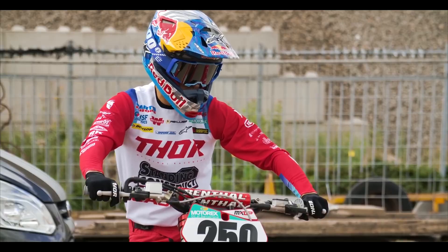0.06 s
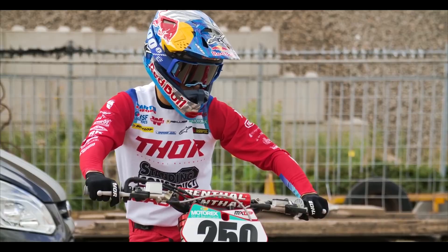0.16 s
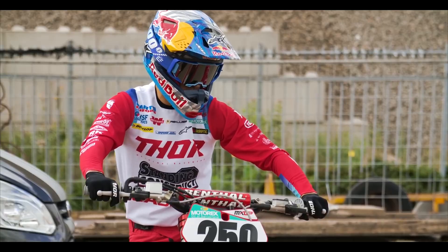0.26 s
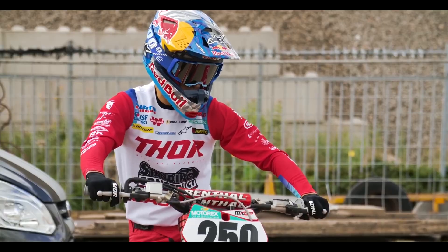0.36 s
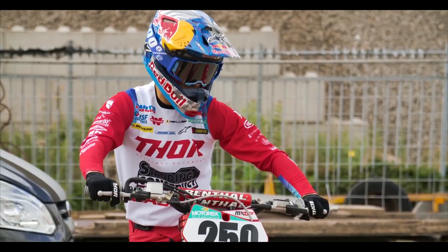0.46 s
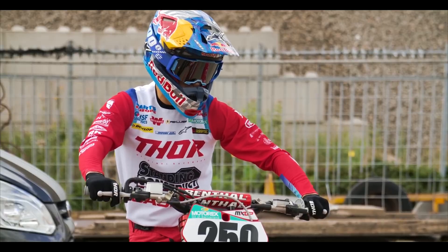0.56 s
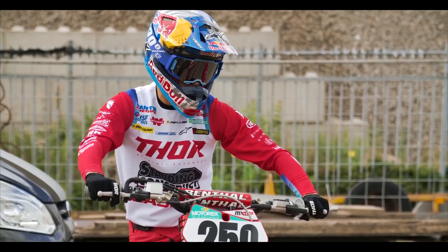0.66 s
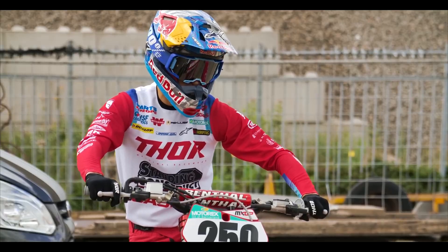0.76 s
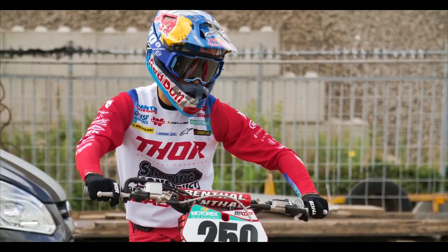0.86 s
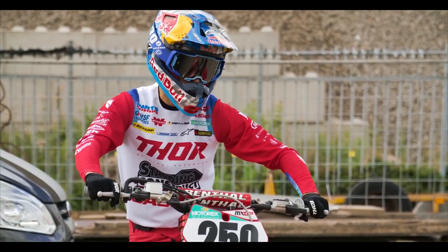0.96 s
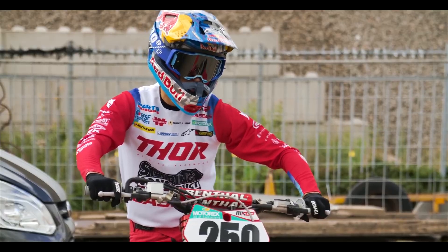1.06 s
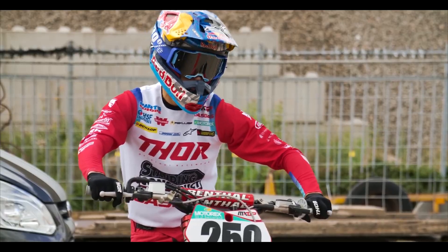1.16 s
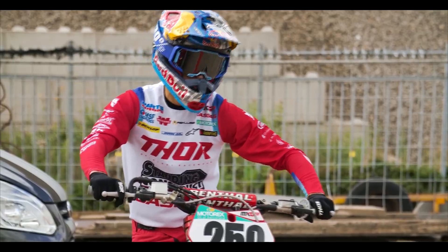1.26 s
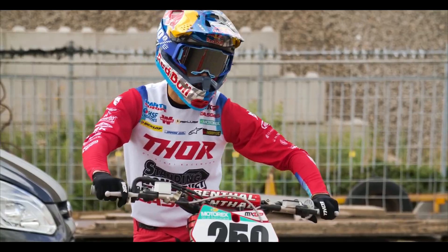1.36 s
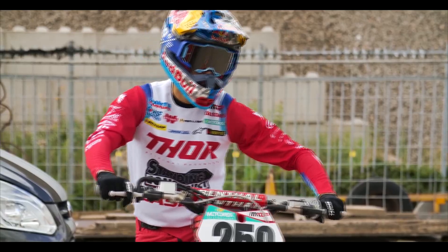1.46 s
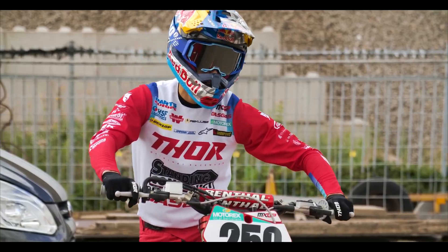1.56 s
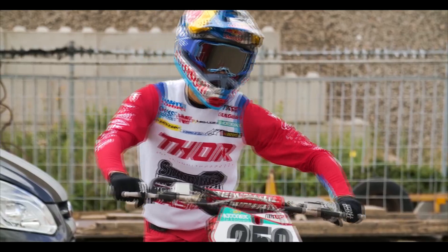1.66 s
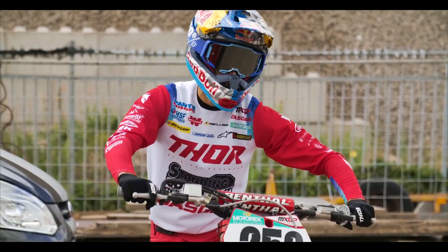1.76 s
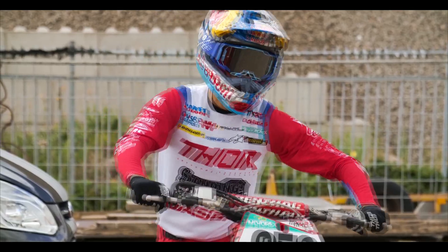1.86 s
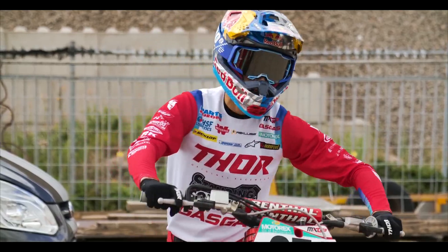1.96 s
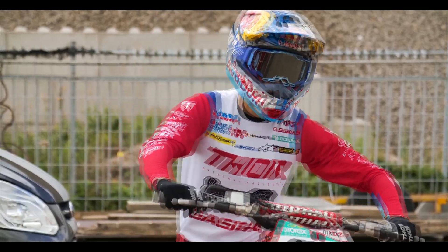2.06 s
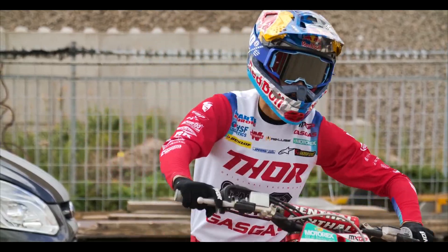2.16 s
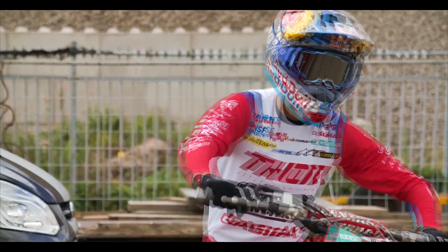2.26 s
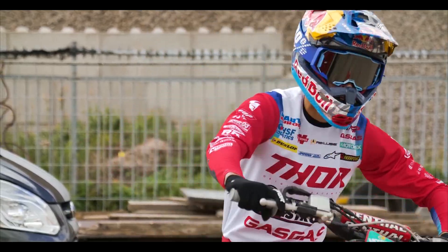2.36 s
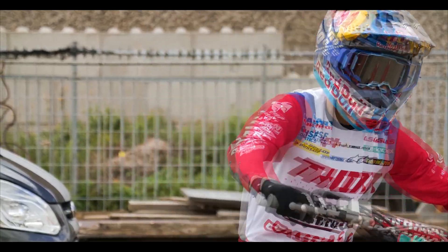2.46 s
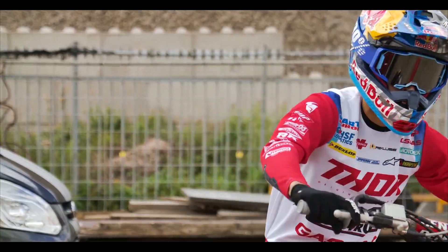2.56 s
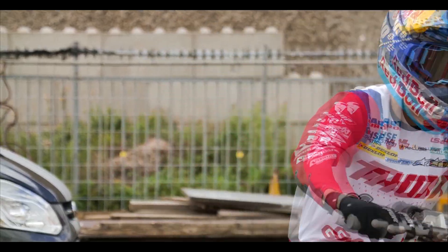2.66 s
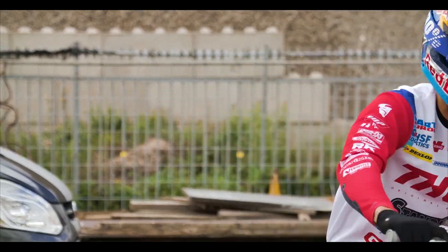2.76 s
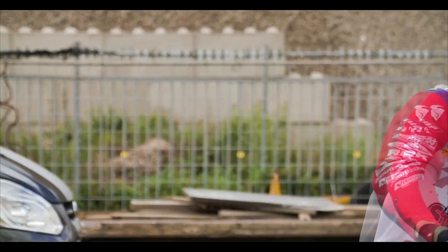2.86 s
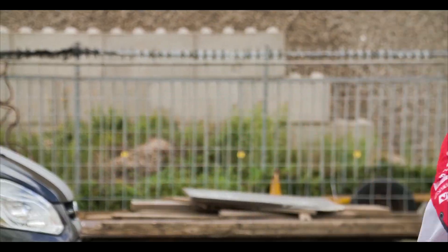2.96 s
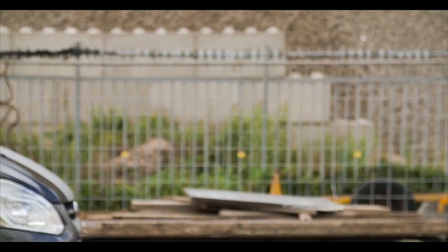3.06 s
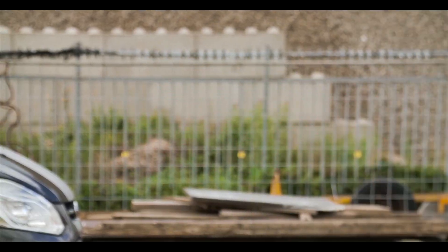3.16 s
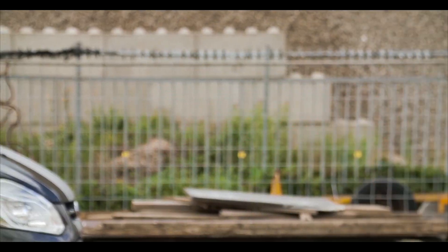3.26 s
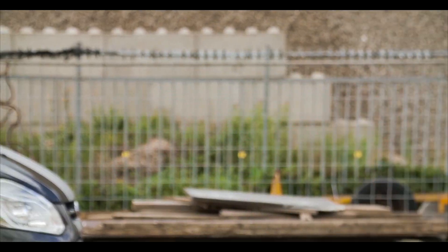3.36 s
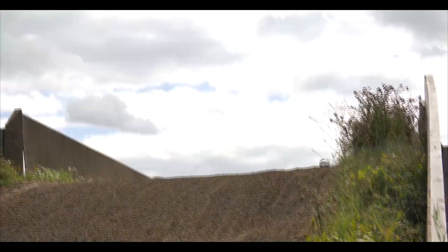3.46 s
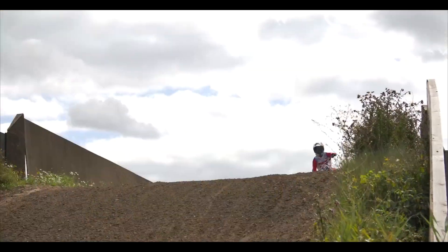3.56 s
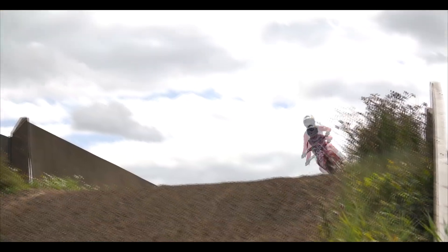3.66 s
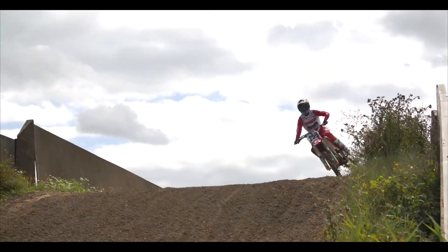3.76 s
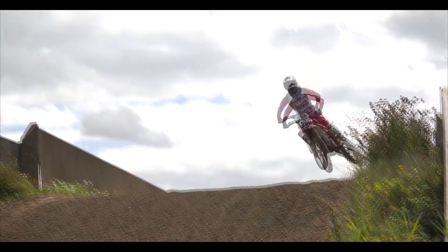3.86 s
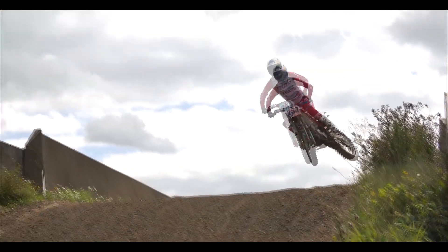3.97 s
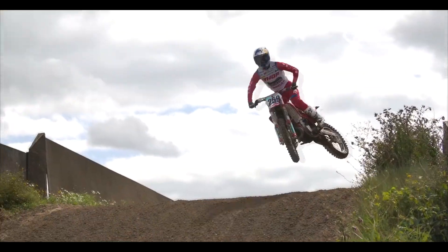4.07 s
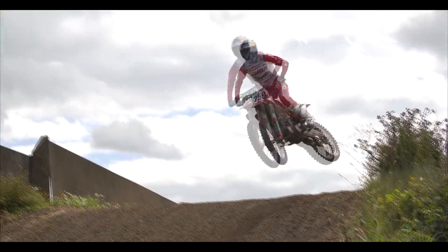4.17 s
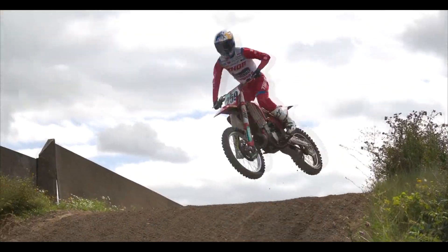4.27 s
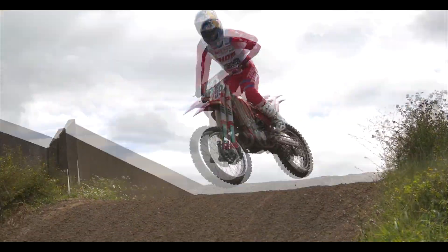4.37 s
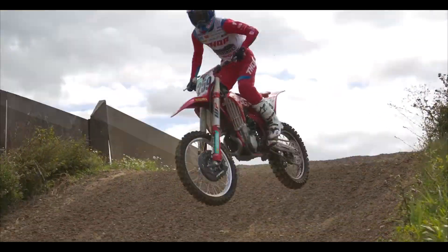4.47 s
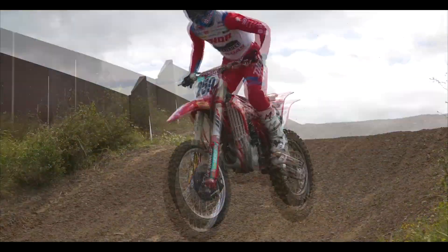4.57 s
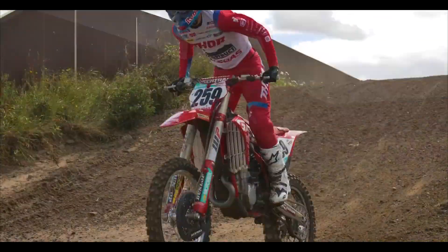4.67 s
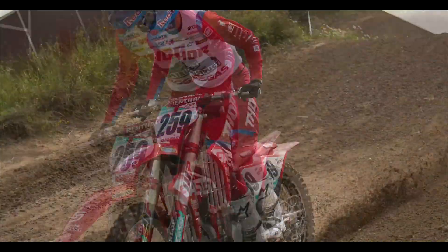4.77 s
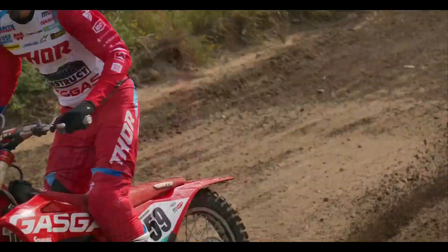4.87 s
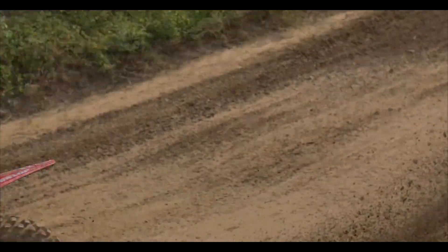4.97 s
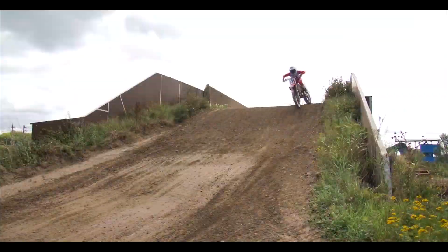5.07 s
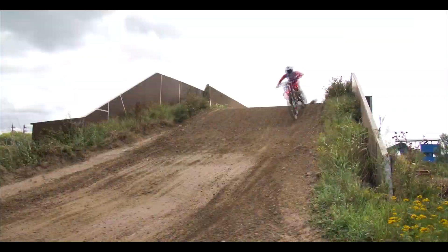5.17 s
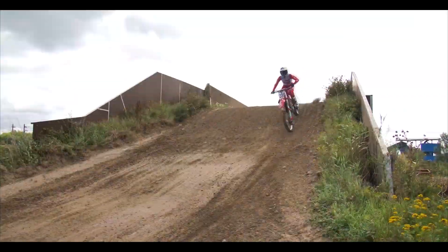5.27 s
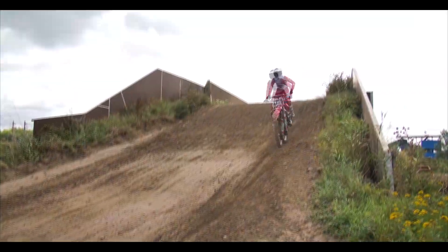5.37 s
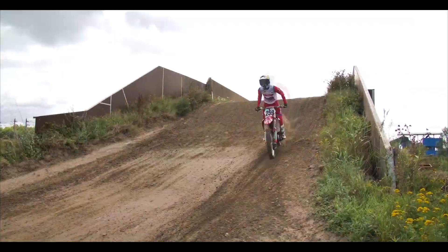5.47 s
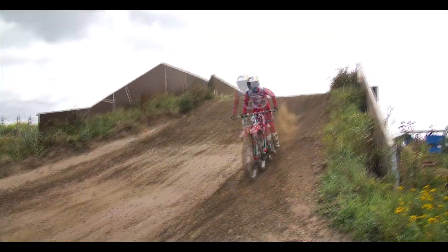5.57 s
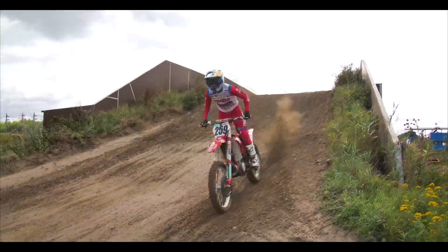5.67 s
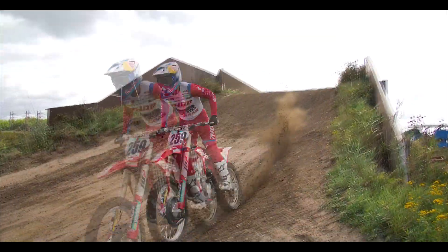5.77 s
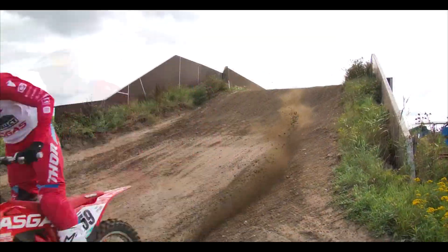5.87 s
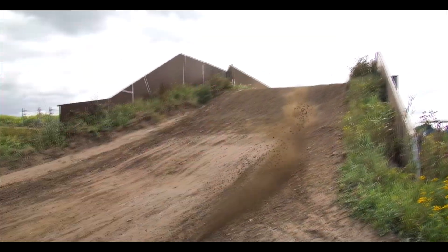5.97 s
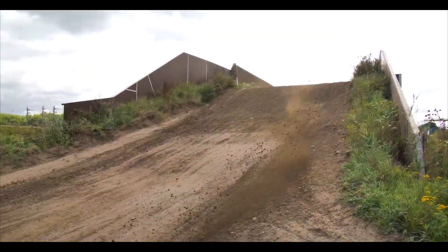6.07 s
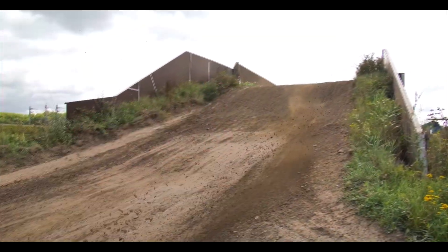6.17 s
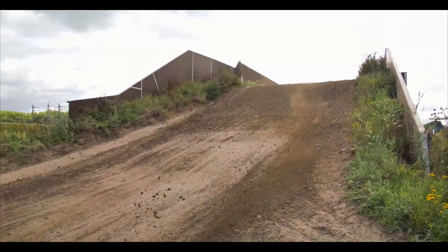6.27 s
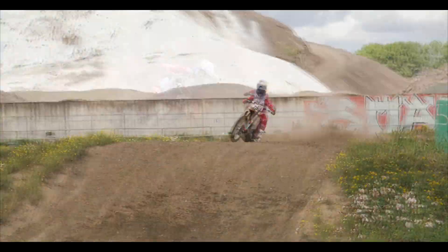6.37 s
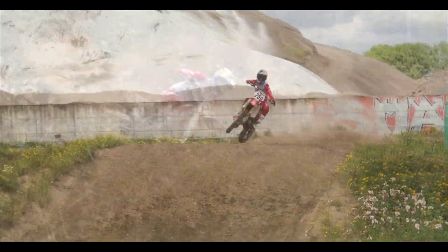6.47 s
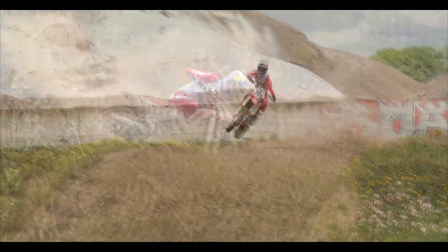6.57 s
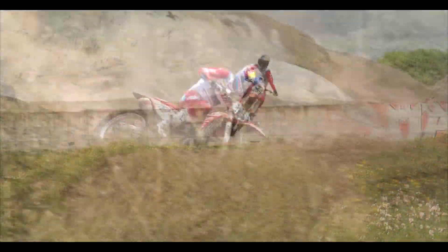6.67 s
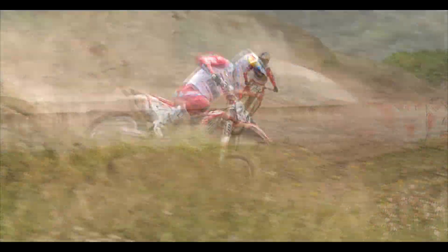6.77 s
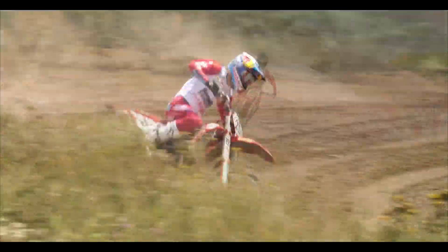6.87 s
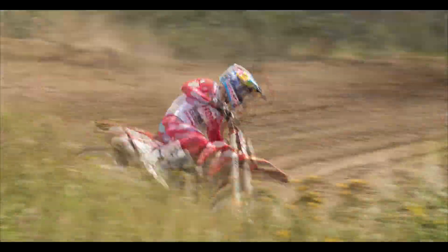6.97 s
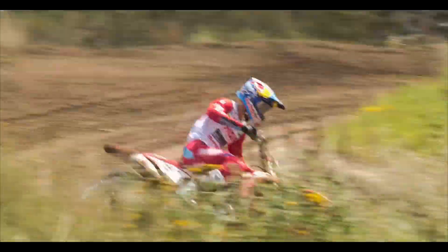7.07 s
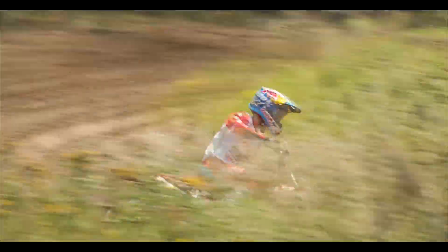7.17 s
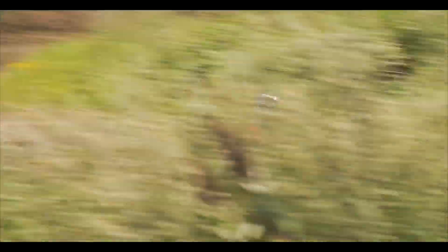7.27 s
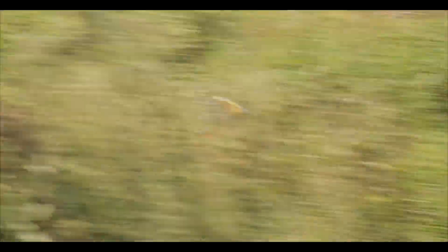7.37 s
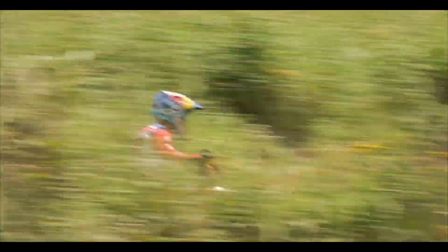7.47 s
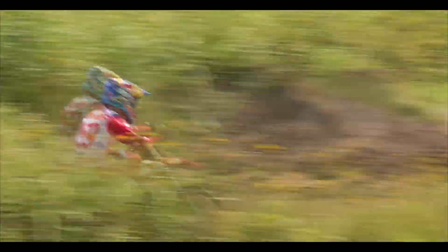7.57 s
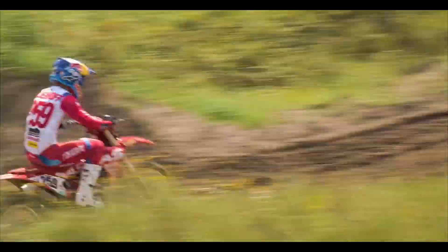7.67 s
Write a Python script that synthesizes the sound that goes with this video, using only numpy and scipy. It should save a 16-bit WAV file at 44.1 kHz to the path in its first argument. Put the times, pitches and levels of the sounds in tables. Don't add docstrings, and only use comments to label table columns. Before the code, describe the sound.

A four-stroke dirt bike idles with clattering valves, clunks into gear and rolls off, then roars past twice on a dirt track and into a corner.

```python
import sys
import numpy as np
from scipy import signal
from scipy.fft import rfft, irfft, next_fast_len
from scipy.io import wavfile
from scipy.ndimage import uniform_filter1d, map_coordinates

SR = 44100
rng = np.random.default_rng(int(sys.argv[2]) if len(sys.argv) > 2 else 0)


def level_to_linear(level):
    exponent = np.asarray(level, float) / 20
    return 10 ** exponent


def master_out(mix):
    frames = np.transpose(np.atleast_2d(mix))
    ceiling = np.clip(frames, -1, 1)
    pcm = np.round(ceiling * 32767).astype(np.int16)
    wavfile.write(sys.argv[1], SR, pcm)


N = 340893
T = np.arange(N) / SR
TRACK_S = 3.45
RIDING = slice(round(TRACK_S * SR), N)

# start_s (centre), level_db, half_length_s
GUSTS = [(.1, -67, 0.065), (.4, -65, 0.084), (3.4, -66, .1), (5.2, -63, 0.26), (6.12, -60, 0.16),
         (6.8, -68, .06), (7.04, -49.5, 0.051), (7.43, -56, 0.17), (7.73, -56, 0.082)]
# delay_s, level_db
BANKS = [
    (.11, -13),
    (0.188, -21),
]
# frequency_hz, t60_s
FIELD = [(100, 1), (450, 0.31), (3000, 0.26), (12000, 0.091)]

# time_s, speed_firings_per_s
IDLE_SPEED = [(0.0, 16.16), (0.2, 16.97), (0.8, 15.05), (1.17, 16.87), (1.49, 19.84), (2.26, 21.29),
              (3.02, 21.21), (3.49, 15.81), (3.9, 17.37)]
# time_s, exhaust_level_db, engine_case_level_db
IDLE_LEVELS = [(0, -59, -62.5), (.9, -56.5, -62), (1.5, -53, -64.5), (2.4, -53, -62.5), (3.2, -57, -59.5),
               (3.28, -67, -58), (3.5, -64, -62.5), (3.75, -67.5, -71), (3.85, -59, -81)]
# pitch_hz, level_db, t60_ms
PIPE = [(94.4, -7.5, 74), (194, 17, 16.5), (320, -24, 17), (487, 26, 11), (574, 1, 14)]
# frequency_hz, level_db_per_hz
CASES = [(430, -3.5), (600, -3), (800, -6.5), (1000, -6), (1290, -1), (1610, -2.5), (2620, -7.5),
         (2950, -5.5), (4810, -13.5), (6010, -16.5), (8830, -22.5), (9790, -34), (12800, -34), (13600, -52),
         (15500, -58)]
# offset_ms (from the firing, at 16 firings per s), level_db, pitch_hz, t60_ms
VALVES = [(-27, -3.5, 3000, 28), (-27, -8, 5900, 16), (-27, -20, 9500, 12), (-18, 0, 1350, 60),
          (-16, -4, 2200, 45), (-17, -6, 700, 45), (-15, -13, 4000, 30), (-6, -3, 1020, 45),
          (18, -15, 8000, 12), (18, -25, 11000, 12), (13, -3, 980, 55)]
# start_s, peak_db
CLUNK = [
    (0.477, -43.5),
]

# time_s, speed_firings_per_s
JUMP = [(3.45, 53), (3.6, 46), (3.79, 41), (3.85, 50), (3.89, 59), (3.92, 71.2), (3.96, 81), (4.034, 87.3),
        (4.663, 54.8)]
LANDING = [(4.7, 60.2), (4.813, 87.9), (4.858, 95.3), (4.957, 69.5), (5.0, 72), (5.05, 66), (5.167, 80),
           (5.238, 69.5), (5.366, 92.9), (5.456, 87.2)]
DESCENT = [(5.491, 79.9), (5.595, 99.5), (5.69, 66), (5.77, 69), (5.878, 83), (5.955, 70.9), (6.03, 86.8),
           (6.095, 80.3), (6.18, 95), (6.22, 92), (6.3, 91)]
BUMPS = [(6.34, 77), (6.424, 90), (6.474, 78.2), (6.59, 91.5), (6.663, 79), (6.763, 94.6), (6.832, 78),
         (7.005, 100.5), (7.063, 86)]
CORNER = [(7.107, 87), (7.165, 82), (7.26, 86.7), (7.36, 81.5), (7.42, 82), (7.462, 78), (7.527, 84.4),
          (7.576, 76.5), (7.646, 77.5), (7.691, 71.3), (7.731, 72.5)]
# time_s, boom_level_db, bite_over_boom_db
JUMP_LOAD = [(3.5, -63.5, -39), (3.76, -65, -27), (3.87, -47.5, -22.5), (3.99, -38.5, -17.5),
             (4.07, -53, 2), (4.16, -56, 6), (4.28, -50.5, 1.5), (4.46, -45.5, -7), (4.68, -49, -6.5)]
LANDING_LOAD = [(4.72, -38.5, -8.5), (4.8, -31, -11), (4.85, -25, -16.5), (4.93, -26.5, -12),
                (5.03, -27, -12), (5.15, -29.5, -4.5), (5.24, -32.5, -3.5), (5.34, -31.5, -7),
                (5.4, -41, -14.5)]
DESCENT_LOAD = [(5.49, -32.5, -14.5), (5.62, -28, -22), (5.8, -31.5, -16), (5.9, -28, -12.5),
                (6.01, -27, -7), (6.1, -20.5, -6), (6.2, -23.5, -8), (6.27, -34, -5), (6.36, -47, -4.5)]
BUMPS_LOAD = [(6.4, -41, -6.5), (6.52, -38.5, -13), (6.73, -42, -14.5), (6.79, -40.5, -16),
              (6.83, -45.5, -5.5), (6.93, -41, -8), (6.99, -46, -7.5), (7.02, -42.5, -9.5)]
CORNER_LOAD = [(7.16, -39.5, -7), (7.25, -36.5, -9), (7.32, -37.5, -9.5), (7.37, -36.5, -10.5),
               (7.47, -38, -6), (7.54, -37, -14.5), (7.63, -41.5, -11), (7.73, -40.5, -4)]
# time_s, chamber_hz, width_over_centre,
# extra_ground_path_ms
SILENCER = [(3.47, 190, 0.58, 4.9),
            (3.84, 206, 0.7, 4.8), (3.9, 264, 0.39, 4.5), (3.97, 230, 0.25, 5.7),
                (4.04, 357, 0.72, 4.7), (4.1, 500, 1.0, 4), (4.16, 497, 1.0, 4.6), (4.23, 217, 0.76, 4.1),
                (4.3, 163, 1.0, 5.5), (4.36, 176, 0.6, 5.1), (4.42, 166, 0.34, 5.8), (4.49, 159, 0.64, 6.1),
                (4.56, 150, 0.8, 5.8), (4.62, 141, 0.28, 6.2), (4.68, 228, 0.95, 6.4),
                (4.75, 240, 1.0, 7.6), (4.81, 244, 0.31, 6.8), (4.88, 235, 0.33, 6.0),
                (4.94, 292, 0.3, 7.8), (5.01, 290, 0.38, 6.1), (5.07, 264, 0.41, 9.9), (5.14, 192, 0.3, 7),
                (5.2, 212, 0.71, 8.3), (5.27, 278, 1.0, 8.1), (5.33, 329, 1.0, 8.1), (5.4, 297, 0.44, 8.4),
                (5.46, 225, 0.31, 7.3), (5.53, 246, 0.28, 7.3), (5.59, 280, 0.23, 5.75),
                (5.66, 246, 0.56, 8), (5.72, 284, 0.59, 6.6),
            (5.79, 278, 0.9, 7.1), (5.85, 164, 0.54, 6.4), (5.92, 207, 1, 5.6), (5.98, 198, 1.0, 6.3),
               (6.05, 111, 0.95, 4.95), (6.11, 285, 0.24, 4.5), (6.18, 378, 0.21, 5.6),
               (6.24, 475, 0.46, 5.4), (6.31, 500, 0.8, 5.8), (6.37, 366, 1.0, 2.5), (6.44, 282, 1.0, 3.2),
               (6.5, 224, 0.85, 2.5), (6.57, 264, 0.42, 2.8), (6.63, 256, 0.42, 2.15),
               (6.7, 239, 0.66, 4.5), (6.76, 244, 0.18, 4.9), (6.83, 333, 0.35, 2.4),
               (6.89, 292, 0.31, 2.5), (6.96, 353, 1.0, 2), (7.02, 372, 0.5, 2.2), (7.09, 318, 0.35, 2.36),
               (7.15, 373, 0.3, 2.4), (7.22, 384, 0.34, 2.35), (7.28, 391, 0.16, 2.08),
               (7.35, 406, 0.33, 2.1), (7.41, 390, 0.39, 1.9), (7.48, 313, 0.28, 3.26),
               (7.54, 282, 0.27, 3.6), (7.61, 290, 0.95, 3.9), (7.67, 267, 1.0, 4.6)]
STAGES = [
    3.45,
    4.04,
    4.68,
    5.06,
    5.42,
    6.0,
    6.32,
    6.82,
    7.34,
    7.74,
]
BURN = [(.3, .35), (.35, .2), (.2, .15), (.12, .25), (.3, .12), (.12, .22), (.4, .2), (.15, .07), (.07, .1)]
# growl_from_db, growl_to_db (over the boom), fizz_from_db, fizz_to_db (over the bark)
MIX = [(37, 6, -24, -12.5), (-7.5, 3.5, -14, -9), (7, 3, -7.5, -10), (6, 3.5, -9.5, -10.5), (10, 8, -9, -9),
       (5, 1, -9, -16.5), (3.5, 4.5, -5, -14.5), (-0.5, 0.5, -11, -8.5), (-2.5, 4, -10, -17)]
# time_s, pitch_hz
VOICE = [(3.47, 320), (3.86, 540), (3.93, 680), (4.04, 694), (4.15, 1110), (4.24, 1060), (4.32, 780),
         (4.44, 865), (4.52, 590), (4.66, 477), (4.72, 605), (4.86, 760), (4.92, 1000), (4.97, 1140),
         (5.07, 910), (5.16, 545), (5.24, 586), (5.36, 705), (5.45, 890), (5.72, 930), (5.87, 990),
         (5.96, 720), (6.05, 560), (6.12, 570), (6.18, 755), (6.22, 766), (6.31, 686), (6.45, 615),
         (6.58, 720), (6.68, 855), (6.76, 925), (6.84, 840), (6.97, 1220), (7.08, 980), (7.2, 950),
         (7.32, 790), (7.45, 653), (7.56, 534), (7.66, 695), (7.72, 666)]
# time_s, clean_crack (0-1), jet_bunched_behind_firing (0-1)
PUNCH = [(3.47, 0, .2), (4.02, .05, .15), (4.1, 0, .1), (4.66, .1, .15), (4.72, .75, .6), (4.78, .6, .7),
         (4.83, .15, .25), (4.89, .25, .4), (4.92, .55, .85), (5.0, .6, .8), (5.06, .55, .7),
         (5.11, .55, .8), (5.17, .35, .45), (5.22, .7, .85), (5.35, .55, .75), (5.46, .4, .6),
         (5.53, .1, .2), (5.72, .15, .25), (5.8, .3, .7), (5.95, .5, .75), (6.02, .4, .45),
         (6.12, .75, .95), (6.2, .6, .75), (6.31, .7, .85), (6.42, .3, .5), (6.49, .5, .85), (6.6, .45, .8),
         (6.67, .6, .95), (6.73, .2, .5), (6.8, .25, .5), (6.84, .7, .8), (6.96, .7, .8), (7.03, .35, .4),
         (7.12, .5, .7), (7.17, .85, .85), (7.24, .7, .8), (7.31, .8, .85), (7.37, .95, .95), (7.46, 1, 1),
         (7.56, .95, 1), (7.63, .75, .8), (7.7, .85, 1)]
# time_s, lead_ms
LEAD = [(6.3, 7.5), (6.4, 5.5)]
# frequency_hz, level_db_per_hz
RASP = [(180, 3.5), (300, -9.5), (337, -30), (517, -10), (562, 1.5), (610, -39), (1090, -12), (2930, -19.5),
        (3400, -23.5), (6250, -26), (15500, -44)]
# pitch_hz, width_hz
TIP = [
    (2900, 3000),
    (2150, 1100),
]
# time_s, share (0-1)
TURNED = [(4.66, .2), (5.05, .3), (5.25, .85), (5.45, .85), (5.5, .3), (6.08, .3), (6.14, .8), (7.3, .8),
          (7.4, .95)]
# start_s (centre), level_db, half_length_s
SHAKES = [(4.0, -73, .05), (4.24, -72, 0.15), (4.88, -65, 0.04), (5.25, -48.5, 0.13), (5.5, -57, 0.053),
          (6.15, -47.5, 0.17), (6.42, -62, 0.079), (6.63, -53.5, 0.12), (6.9, -66, 0.079),
          (7.28, -62.5, 0.15), (7.52, -55.5, 0.15)]
# start_s, end_s, level_db
CUTS = [(5.37, 5.444, 3.5), (6.195, 6.315, -5), (6.972, 6.991, -7), (7.32, 7.347, -11)]
# start_s, peak_db
POPS = [(5.345, -29), (5.379, -22), (5.399, -27), (5.4217, -27), (6.2077, -14), (6.239, -13.5),
        (6.2499, -23), (6.2713, -21), (6.293, -18.5), (6.305, -28), (6.316, -28.5), (6.328, -32)]
# time_s, level_db
CEILING = [(4.7, -24), (4.85, -21.5), (5.1, -23), (5.25, -25), (5.36, -27), (5.6, -22.5), (6.14, -21.3),
           (6.25, -21.3), (6.3, -23)]


def unit(x):
    return x / np.sqrt(np.mean(x ** 2) + 1e-20)


def along(points, hz):
    f, v = np.transpose(points)
    return np.interp(np.log(hz + 1), np.log(f + 1), v)


def curves(rows):
    s, *cols = np.transpose(rows)
    return [np.interp(T, s, c) for c in cols]


def staged(rows):
    s = np.ravel([(a + .02, b - .02) for a, b in zip(STAGES, STAGES[1:])])
    rows = np.array(rows, float)
    return [np.interp(T, s, rows[:, k:k + 2].ravel()) for k in range(0, rows.shape[1], 2)]


def swells(rows):
    return sum(level_to_linear(db) * np.exp(-((T - s) / half) ** 2) for s, db, half in rows)


def wobble(rate):
    knots = rng.standard_normal(int(N * rate / SR) + 4)
    return np.interp(T, T[::32], map_coordinates(knots, [T[::32] * rate]))


def filtered(x, response):
    m = next_fast_len(N + SR // 2)
    return irfft(rfft(x, m) * response(np.fft.rfftfreq(m, 1 / SR)), m)[:N]


def band(lo_hz, hi_hz):
    return lambda f: 1 / (1 + (lo_hz / (f + 1)) ** 4) / (1 + (f / hi_hz) ** 4)


def peak(f, hz, width_hz):
    return 1j * f * width_hz / (hz * hz - f * f + 1j * f * width_hz)


def noise(spectrum):
    return unit(filtered(rng.standard_normal(N), lambda f: level_to_linear(along(spectrum, f))))


def noise_through(response):
    return unit(filtered(rng.standard_normal(N), response))


def riding_band(x, lo_hz, hi_hz):
    y = filtered(x, band(lo_hz, hi_hz))
    return y / np.std(y[RIDING])


def firings(cycles):
    return np.flatnonzero(np.diff(np.floor(cycles)))


def add(out, at, sound):
    out[max(at, 0):at + len(sound)] += sound[max(-at, 0):max(len(out) - at, 0)]


def wind():
    rumble = filtered(rng.standard_normal(N), band(20, 60))
    breeze_db = -78.5
    return (level_to_linear(breeze_db) + swells(GUSTS)) * unit(level_to_linear(3.1 * wobble(12)) * rumble)


def surroundings(x):
    hz, t, z = signal.stft(rng.standard_normal(SR // 2), SR, nperseg=256)
    tail = signal.istft(z * level_to_linear(-60 * t / along(FIELD, hz)[:, None]), SR, nperseg=256)[1]

    def banks(f):
        return band(150, 1500)(f) * sum(level_to_linear(db) * np.exp(-2j * np.pi * f * s) for s, db in BANKS)

    return filtered(x, banks) + level_to_linear(-10) * signal.fftconvolve(x, tail / np.linalg.norm(tail))[:N]


def drive_line():
    t = np.arange(3000) / SR
    chain = swells([(2.93, -72.5, 0.49)])
    gear = chain * level_to_linear(2 * wobble(40)) * noise_through(band(5500, 8300))
    for s, db in CLUNK:
        add(gear, round(s * SR), level_to_linear(db - 8 - 60 * t / 0.13) * noise(CASES)[:len(t)])
    first_s, gap_s, clack_db, loss_db = 3.346, .061, -52.5, 2
    for k in range(5):
        ring = np.sin(2 * np.pi * rng.normal(2400, 90) * t) + .6 * noise(CASES)[:len(t)]
        fade = level_to_linear(clack_db - k * loss_db - 60 * t / .04) * np.clip(t / .003, 0, 1)
        add(gear, round((first_s + k * gap_s) * SR), fade * ring)
    return gear


def valve_taps(starts, speed):
    t = np.arange(3000) / SR
    taps = np.zeros(N)
    for at in starts:
        for ms, db, hz, t60_ms in VALVES:
            resonator = [1, -1.94 * np.cos(2 * np.pi * hz / SR), .9409]
            tap = unit(signal.lfilter([1], resonator, rng.standard_normal(len(t))))
            tap = tap + .25 * np.sin(2 * np.pi * hz * t)
            fade = level_to_linear(db + rng.normal(0, 1) - 60000 * t / t60_ms) * np.clip(t / (t60_ms / 14000), 0, 1)
            add(taps, at + round(ms * 16 / speed[at] * SR / 1000), fade * tap)
    return unit(filtered(taps, band(600, 25000)))


def engine_cases(starts, speed, heat, clatter_db):
    taps = valve_taps(starts, speed)
    steady = np.clip(3.5 * heat - 2.75, .5, 1)
    cases = level_to_linear(clatter_db) * (steady * level_to_linear(1.2 * wobble(40)) * noise(CASES) + .75 * taps)
    whine_db = clatter_db - 12 + 2.1 * (speed - 16)
    whine = noise_through(lambda f: peak(f, 1240, 210) ** 2)
    return cases + level_to_linear(whine_db - 6 + 0.4 * wobble(60)) * whine


def exhaust_thumps(starts, heat):
    passed_s = 3.5
    upper_db = np.interp(T, [1.7, 2.77, passed_s, passed_s + 0.056], [-38, -9.5, -9.5, -25])
    near_db = 13.5 * np.exp(-((T - 3.21) / 0.39) ** 2)
    bearing_share = (0, 0, .4, 1, 1)
    t = np.arange(3000) / SR
    rise = np.clip(t / .0036, 0, 1) ** 3
    thumps = np.zeros(N)
    for at in starts:
        lean_db = -4 * (abs(at / SR - .44) < .02)
        modes = []
        for k, (hz, db, t60_ms) in enumerate(PIPE):
            mode_db = db + (k == 0) * near_db[at] + lean_db + bearing_share[k] * upper_db[at]
            fade = level_to_linear(mode_db + rng.normal(0, .8) - 60000 * t / t60_ms)
            modes.append(fade * np.cos(2 * np.pi * hz * heat[at] * (t - .0034) - 1.25))
        for trip, share in enumerate((1, .65, .18)):
            heard = modes[:3] if trip else modes
            add(thumps, at - 90 + round(trip * .0088 * SR / heat[at]), share * rise * sum(heard))
    seen = level_to_linear(.5 * upper_db)
    shadow_hz = 382
    shaded = filtered(thumps, lambda f: band(60, shadow_hz)(f) * band(1, 1.4 * shadow_hz)(f))
    return seen * filtered(thumps, band(60, 2000)) + (1 - seen) * shaded


def idle():
    (thump_db, clatter_db), (speed,) = curves(IDLE_LEVELS), curves(IDLE_SPEED)
    slipping = (T > 2.1) * (T < 3.0)
    speed = speed + .5 * np.sin(2 * np.pi * (T - 2.1) / .6) * slipping
    heat = 0.94 + 0.024 * (speed - 16)
    starts = firings(np.cumsum(speed) / SR - .4)
    thumps = exhaust_thumps(starts, heat)
    cases = engine_cases(starts, speed, heat, clatter_db)
    on = np.clip((3.9 - T) / .1, 0, 1)
    return on * (level_to_linear(thump_db) * unit(thumps * on) + cases) + drive_line()


def exhaust_orders(cycles, speed, rough, bunched):
    centre_hz, width, path_ms = (c[RIDING] for c in curves(SILENCER))
    growl_hz, lead_ms = curves(VOICE)[0][RIDING], curves(LEAD)[0][RIDING]
    facing = np.interp(T, [6.97, 7.04, 7.3, 7.48, 7.55], [.06, 1, 1, .3, .05])[RIDING]
    chamber_top_hz = np.maximum(492, 1.25 * centre_hz)
    ground_share = 0.53
    boom, boom_power, growl, growl_power = np.full((4, N), 1e-9)
    for k in range(2, 22):
        hz = k * speed[RIDING]
        scatter_rad = 2.67 * (1 - bunched) ** 2 * wobble(1.503)
        phase = (2 * np.pi * k * cycles + scatter_rad)[RIDING]
        drift = level_to_linear(((.8 + .12 * k) * wobble(6) + 2.2 * rough * wobble(30))[RIDING])
        if k < 8:
            ring = peak(hz, centre_hz, width * centre_hz) * (centre_hz / hz) ** .25
            ring = ring * band(80, chamber_top_hz)(hz) * drift ** .3
            ring *= abs(1 - ground_share * np.exp(-2j * np.pi * hz * path_ms / 1000))
            turns = k * cycles[RIDING] + hz * lead_ms / 1000
            boom[RIDING] -= np.real(ring * np.exp(2j * np.pi * turns))
            boom_power[RIDING] += abs(ring) ** 2 / 2
        pipe_mode = 3.2 * facing * abs(peak(hz, 1050, 220)) ** 2
        weight = drift * band(470, 1500)(hz) * (.25 + abs(peak(hz, growl_hz, 200)) + pipe_mode)
        growl[RIDING] -= weight * np.cos(phase)
        growl_power[RIDING] += weight ** 2 / 2
    return boom / np.sqrt(boom_power), growl / np.sqrt(growl_power)


def firing_pulses(cycles, speed):
    at = firings(cycles)
    size = -level_to_linear(1.3 * rng.standard_normal(len(at)))
    late = cycles[at + 1] % 1 * SR / speed[at]
    cracks = np.zeros(N)
    cracks[at], cracks[at + 1] = size * late, size * (1 - late)
    return cracks


def exhaust_jet(cracks, speed, bunched):
    decay_s = .0024
    burst = signal.lfilter([1], [1, -np.exp(-1 / (decay_s * SR))], -cracks) / (speed * decay_s)
    flow = (bunched * burst + 1 - .9 * bunched) / np.sqrt(1 + 1.8 * bunched ** 2)
    return noise(RASP) * flow * level_to_linear(1.1 * wobble(30))


def scattered(pulses):
    t = np.arange(1200) / SR
    turn = np.pi * wobble(3) / 2
    fade = level_to_linear(-60 * t / .022) * np.clip(t / 0.012, 0, 1)
    a, b = (signal.fftconvolve(pulses, rng.standard_normal(len(t)) * fade)[:N] for _ in range(2))
    return np.cos(turn) * a + np.sin(turn) * b


def tail_pipe_bark(cracks, jet, sharp, rough):
    side, rear = (riding_band(filtered(cracks, lambda f: .3 + peak(f, hz, width_hz)), 1100, 4600)
                  for hz, width_hz in TIP)
    behind = np.interp(T, [5.0, 5.1, 5.22, 5.3, 5.5, 7.25, 7.4], [1, .5, 1, .5, .4, .2, 1])
    crack = sharp ** 1.4 * ((1 - behind) * side + behind * rear)
    smeared = 0.95 * (1 - sharp) * (1 - rough) * riding_band(scattered(cracks), 700, 4300)
    coast = np.interp(T, (4.0, 4.1, 4.62, 4.7), [1, .6, .6, 1])
    return crack + smeared + coast * np.sqrt(.68 - .62 * sharp) * riding_band(jet, 1300, 4500)


def jet_fizz(cracks, jet, sharp):
    turned, = curves(TURNED)
    hiss = turned * unit(jet) + np.sqrt(1 - turned ** 2) * noise(RASP)
    return 0.046 * sharp * riding_band(cracks, 3300, 4900) + riding_band(hiss, 2800, 14600)


def frame_shaking(cycles, bark_db):
    shake = (level_to_linear(bark_db - 22) + swells(SHAKES)) * level_to_linear(2 * wobble(14))
    return np.sqrt(2) * shake * np.sin(2 * np.pi * cycles) * (T > 3.8)


def limiter_pops():
    t = np.arange(1500) / SR
    puff = riding_band(filtered(noise(RASP), band(500, 12000)), 1250, 5500)
    pops = np.zeros(N)
    for s, db in POPS:
        at = round(s * SR)
        add(pops, at, level_to_linear(db - 5 - 60 * t / 0.018) * puff[at:at + len(t)])
    return pops


def track():
    speed, = curves(JUMP + LANDING + DESCENT + BUMPS + CORNER)
    boom_db, bite_db = curves(JUMP_LOAD + LANDING_LOAD + DESCENT_LOAD + BUMPS_LOAD + CORNER_LOAD)
    (sharp, bunched), (rough,) = curves(PUNCH), staged(BURN)
    growl_over_db, fizz_over_db = staged(MIX)
    bark_db = boom_db + bite_db
    growl_db = growl_over_db + boom_db + 1.177 * bite_db
    fizz_db = fizz_over_db + bark_db
    cycles = np.cumsum(speed * (1 + .003 * wobble(60))) / SR
    boom, growl = exhaust_orders(cycles, speed, rough, bunched)
    cracks = firing_pulses(cycles, speed)
    jet = exhaust_jet(cracks, speed, bunched)
    low = boom + .55 * rough * riding_band(noise(RASP), 120, 450)
    middle = np.sqrt(1 - .55 * rough) * growl + np.sqrt(.55 * rough) * riding_band(jet, 420, 1300)
    bark = tail_pipe_bark(cracks, jet, sharp, rough)
    fizz = jet_fizz(cracks, jet, sharp)
    cut_db = uniform_filter1d(sum(db * ((T > a) & (T < b)) for a, b, db in CUTS), size=200)
    upper = level_to_linear(growl_db) * middle + level_to_linear(bark_db) * bark + level_to_linear(fizz_db) * fizz
    ride = level_to_linear(boom_db + .5 * cut_db) * low + level_to_linear(cut_db) * upper
    ride += frame_shaking(cycles, bark_db) + limiter_pops()
    return ride * np.clip((T - TRACK_S) / .08, 0, 1)


def scene():
    waiting, riding = idle(), track()
    sent = filtered(riding, lambda f: .35 + .65 * band(420, SR)(f)) + .55 * waiting
    return (waiting + riding + surroundings(sent) + wind())[None]


def low_pass(x):
    return signal.sosfilt(signal.butter(12, 15710, fs=SR, output="sos"), x)


def record(dry):
    top = level_to_linear(curves(CEILING)[0])
    shaved = dry[0] / (1 + abs(dry[0] / top) ** 6) ** (1 / 6) - dry[0]
    flattened = dry[0] + filtered(shaved, band(78, 30000))
    offset = -.0009 * np.clip((T - TRACK_S) / .1, 0, 1)
    mix = filtered(flattened, lambda f: f < 15750)[None] + offset
    return low_pass(mix)


dry = scene()
out = record(dry)
master_out(out)
```